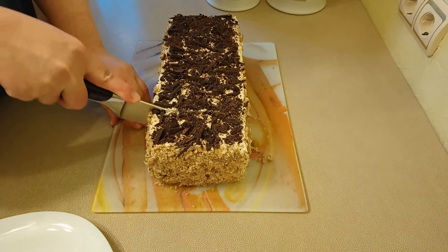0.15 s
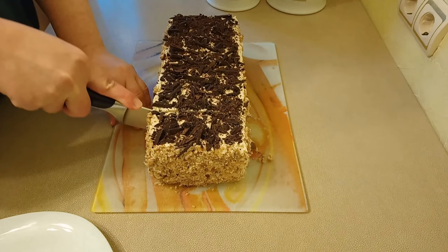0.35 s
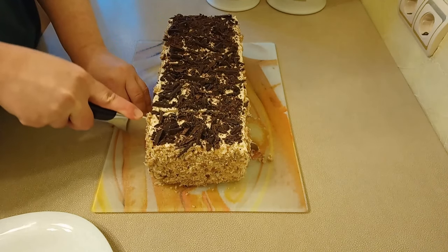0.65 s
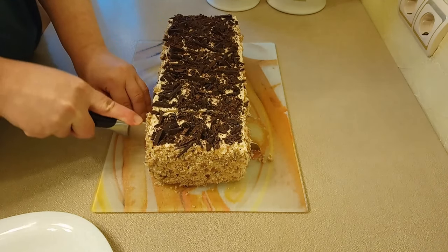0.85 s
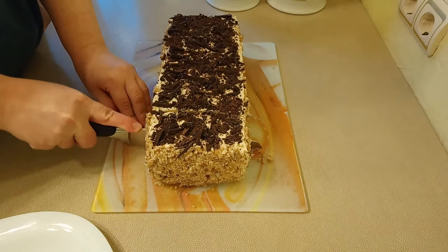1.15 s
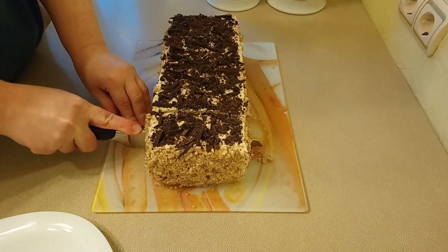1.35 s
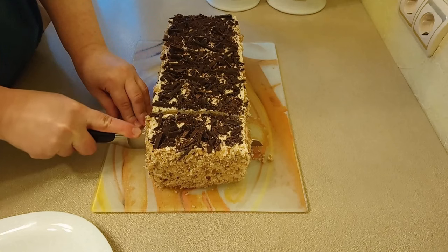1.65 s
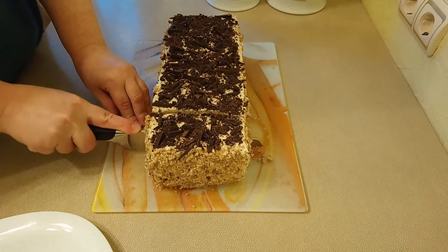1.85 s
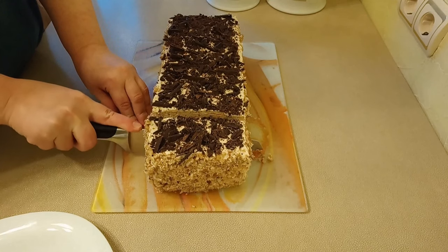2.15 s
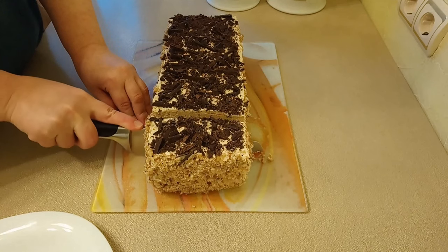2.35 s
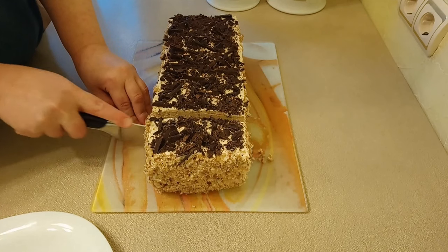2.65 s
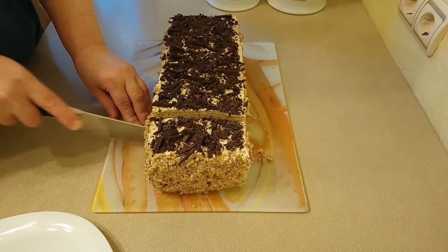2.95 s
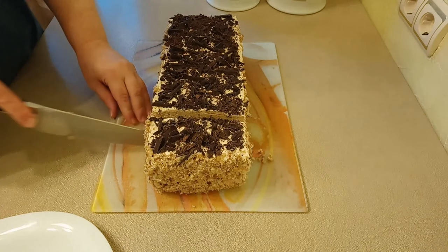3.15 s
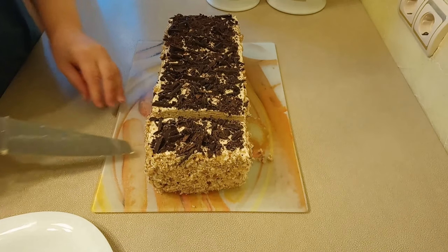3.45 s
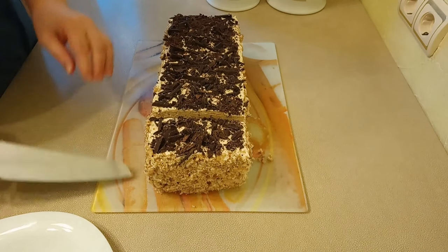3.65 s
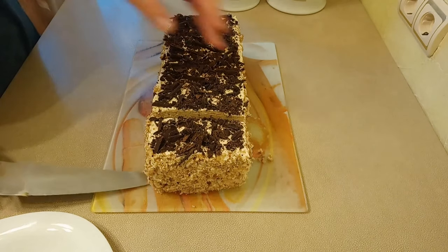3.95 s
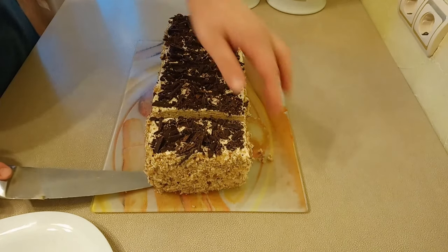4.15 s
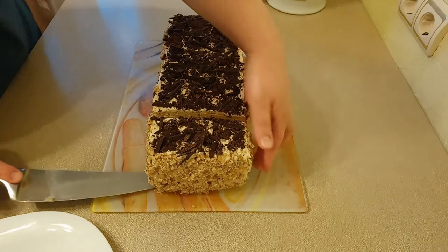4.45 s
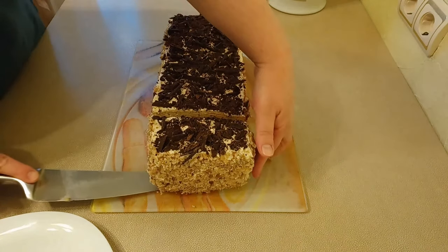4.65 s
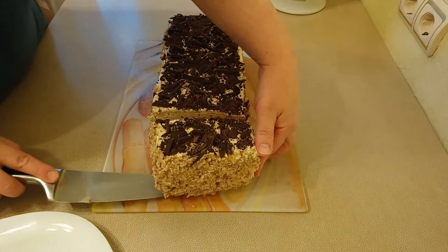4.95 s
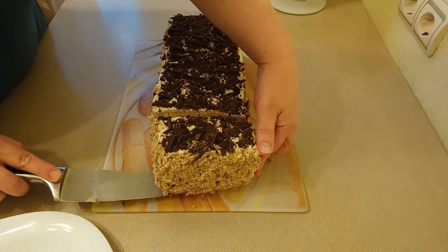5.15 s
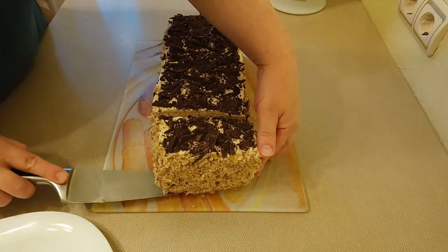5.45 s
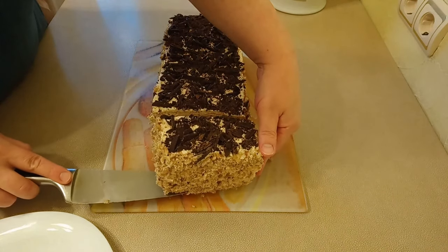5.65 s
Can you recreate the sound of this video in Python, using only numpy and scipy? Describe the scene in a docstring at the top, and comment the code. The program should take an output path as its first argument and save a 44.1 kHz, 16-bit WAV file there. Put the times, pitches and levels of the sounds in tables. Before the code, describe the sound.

A small kitchen is heard closely in stereo, with quiet room air, a low wavering motor hum and very faint high electrical whines towards the right. A tiny tick comes at 0.05 s; at 0.6-0.75 s chocolate and crust snap crisply, with soft sponge rustle until about 1 s. Near 1.8 s the knife edge hits the glass board with a sharp, squeaky knock. Short rasps and knocks follow at 2.0-2.2 s, then stronger gritty drags from 2.55 to 3.1 s, ringing, squeaking and brightening, ending in the hardest catches. The hum swells around 2.3-4.7 s. After a pause, the flat steel blade clinks in a quick cluster at 3.75-3.83 s with a short singing squeal and a low worktop thud. A hand taps at 4.18 s amid faint sliding. Around 4.6-5 s the blade slips under the slice with muffled scraping and rising steel tones; a tiny clink comes at 5.43 s, then quiet.

```python
"""Cutting a slice of layer cake

A small kitchen, heard close by a left and a right microphone, over room air, a low hum and faint whines.
A knife cracks the chocolate with filtered bursts, then knocks and drags on a glass board of ringing modes.
The blade is laid flat with a clink, a hand taps something with one more burst, and the blade is slid
under the slice; its steel modes rise as it is pressed down.
"""
import sys
import numpy as np
from scipy import signal
from scipy.fft import rfft, irfft
from scipy.io import wavfile
from scipy.ndimage import uniform_filter1d, map_coordinates

SR = 44100
rng = np.random.default_rng(int(sys.argv[2]) if len(sys.argv) > 2 else 0)


def unload_audio(sound):
    """Save the sound as a 16-bit wav file, at the path given as the first command line argument."""
    columns = np.transpose(np.atleast_2d(sound))
    # keep every value between -1 and 1, then stretch to whole-number steps
    steps = np.round(np.clip(columns, -1, 1) * 32767)
    wavfile.write(sys.argv[1], SR, steps.astype(np.int16))


N = 255701
TIME = np.arange(N) / SR
# signs of a difference signal at the left and right microphones
OPPOSITE = np.array([[1], [-1]])


def undb(db):
    """Decibels to gain."""
    return 10 ** (np.asarray(db) / 20)


def unit(x):
    """Scale to rms 1."""
    return x / np.sqrt(np.mean(x ** 2) + 1e-30)


def pan(lean_db):
    """Left and right gains that differ by lean_db, left minus right."""
    return undb(np.array([[lean_db], [-lean_db]]) / 2)


def curve(rows, axis=1):
    """One column of a table, joined by straight lines in time."""
    rows = np.array(rows)
    return np.interp(TIME, rows[:, 0], rows[:, axis])


def response(points, hz):
    """Gain of a (freq_hz, level_db) spectrum at the given frequencies."""
    point_hz, point_db = np.transpose(points)
    return undb(np.interp(np.log(hz + 1), np.log(point_hz), point_db))


def convolve(x, ring):
    """Pass a sound through an impulse response, keeping its length."""
    full = signal.fftconvolve(np.atleast_2d(x), np.atleast_2d(ring), axes=-1)
    return full[:, :x.shape[-1]]


def colour(x, points):
    """Causal filter of unit energy with the given spectrum."""
    size = 1024
    # folding the cepstrum forward in time gives the minimum-phase response
    cepstrum = irfft(np.log(response(points, np.fft.rfftfreq(size, 1 / SR))))
    cepstrum[1:size // 2] *= 2
    cepstrum[size // 2 + 1:] = 0
    ring = irfft(np.exp(rfft(cepstrum)))
    return convolve(x, ring / np.linalg.norm(ring))


def add(track, start_s, sound):
    """Mix a sound in at time start_s."""
    i = int(start_s * SR)
    track[..., i:i + sound.shape[-1]] += sound[..., :N - i]


def walk(rate):
    """Smooth random wander of rms 1, with rate knots a second."""
    knots = rng.standard_normal(2048)
    return unit(map_coordinates(knots, [TIME * rate], order=3, mode="wrap"))


def stroke(start_s, length_s, attack_s, release_s, sag_db=0):
    """Gain that rises to 1, holds while sagging by sag_db a second, and dies; ramps are the time for 20 dB."""
    early_s = np.maximum(start_s - TIME, 0)
    late_s = np.maximum(TIME - start_s - length_s, 0)
    ramp_db = -20 * np.minimum(early_s / attack_s + late_s / release_s, 10)
    return undb(ramp_db - sag_db * np.clip(TIME - start_s, 0, length_s))


def grains(rate, spread_db):
    """Random tiny slips of uneven size, about rate a second, rms 1."""
    size = undb(spread_db * np.clip(rng.standard_normal(N), -2, 2))
    happens = rng.random(N) < rate / SR
    return unit(happens * size * rng.choice([-1, 1], N))


def contact(decay_s, chatter):
    """A blow of unit energy: one sharp push and a dying chatter, chatter times as strong in all."""
    t = TIME[:SR // 6]
    push = rng.standard_normal(len(t)) ** 3 * np.exp(-t / decay_s)
    push *= chatter / np.linalg.norm(push)
    push[0] = 1
    return push / np.linalg.norm(push)


def harden(push, treble_db, corner_hz):
    """Change the share of a force that lies above the corner."""
    soft = signal.sosfiltfilt(signal.butter(2, corner_hz, fs=SR, output="sos"), push)
    return soft + undb(treble_db) * (push - soft)


def resonate(push, hz, t60):
    """One mode whose pitch may move; white noise passes at its own level."""
    turn = np.exp(2j * np.pi * np.cumsum(hz) / SR)
    keep = 1000 ** (-1 / (t60 * SR))
    # shift the mode down to 0 Hz, let it leak away, and shift it back up
    slow = signal.lfilter([1], [1, -keep], push / turn)
    return (turn * slow).imag * np.sqrt(2 * (1 - keep ** 2))


def kitchen(x, wet_db, early_db, t60=0.3, early_s=0.0044, shared_hz=800):
    """Direct sound, a quick scatter off the worktop and a tail from the walls; both microphones share the bass."""
    t = TIME[:SR // 2]
    hz = np.fft.rfftfreq(len(t), 1 / SR)
    scatter = undb(early_db) * unit(np.exp(-t / early_s))
    tail = undb(wet_db) * unit(undb(-60 * t / t60) * (t > 2 * early_s))
    mid, side = rfft(rng.standard_normal((2, len(t))) * (scatter + tail)) / np.sqrt(len(t))
    apart = hz ** 2 / (hz ** 2 + shared_hz ** 2)
    paths = 1 + (mid + OPPOSITE * apart * side) / np.sqrt(1 + apart ** 2)
    # the walls smear the sound in time but favour no band
    paths /= np.sqrt(uniform_filter1d(abs(paths) ** 2, size=21))
    return convolve(x, irfft(paths)[:, :SR * 2 // 5])


# room air and hiss, spectrum: freq_hz, level_db
AIR_SPECTRUM = [(25, -17), (85, -4), (170, 2), (215, -2), (270, -13), (500, -13.5), (1200, -16.5),
                (2500, -19.5), (6200, -18), (8200, -30), (13700, -30.5), (15300, -19)]
AIR_DB = -68


def room_air():
    """Steady shaped noise, more alike at the two microphones in the bass."""
    hz = np.fft.rfftfreq(N, 1 / SR)
    mid, side = rfft(rng.standard_normal((2, N)))
    apart = np.clip(hz / 900, .3, 1)
    spread = (mid + OPPOSITE * apart * side) / np.sqrt(1 + apart ** 2)
    return undb(AIR_DB) * unit(irfft(spread * response(AIR_SPECTRUM, hz), N))


# steady hum level, and one louder spell that slowly eases; the ramp is the time for 20 dB
HUM_DB = -73
HUM_SPELL_S, HUM_SPELL_LENGTH_S, HUM_SPELL_DB, HUM_RAMP_S, HUM_SAG_DB_PER_S = 2.295, 2.37, -60.5, 0.24, 4.5


def appliance_hum():
    """Two wavering harmonics, the second and third, of one motor."""
    cycles = np.cumsum(194 + 4 * walk(12)) / SR
    third = undb(3.5 * walk(9)) * np.sin(2 * np.pi * cycles)
    second = undb(-8) * walk(16) * np.sin(2 * np.pi * cycles * 2 / 3)
    spell = stroke(HUM_SPELL_S, HUM_SPELL_LENGTH_S, HUM_RAMP_S, HUM_RAMP_S, HUM_SAG_DB_PER_S)
    return (undb(HUM_DB) + undb(HUM_SPELL_DB) * spell) * (third + second)


# electrical whines: start_s, length_s, pitch_hz, level_db, lean_db (left minus right)
WHINES = [(0, 11, 7380, -92, -21.5), (0.402, 1.23, 6090, -90, -31), (1.95, 2, 6490, -83, -20.5),
          (3.305, 2.7, 5210, -87, -14), (4.349, 1.35, 6505, -85.5, -24.5)]
WHINE_RAMP_S = 0.193


def electrical_whines():
    """Thin sines with a slight pitch tremor, fading in and out, mostly on the right."""
    out = np.zeros((2, N))
    for start_s, length_s, pitch_hz, level_db, lean_db in WHINES:
        tone = np.sin(2 * np.pi * np.cumsum(pitch_hz + 5 * walk(60)) / SR)
        swell = stroke(start_s, length_s, WHINE_RAMP_S, WHINE_RAMP_S)
        out += pan(lean_db) * undb(level_db) * swell * tone
    return out


def background():
    """Air and hum, leaning a little right, and the whines."""
    return pan(-2.3) * (room_air() + appliance_hum()) + electrical_whines()


# hands bumping the worktop: start_s, peak_db, pitch_hz, decay_s
WORKTOP_BUMPS = [(0.906, -56, 125.5, 0.022), (1.779, -56.5, 103, 0.064), (3.825, -49, 156, 0.12),
                 (4.198, -52, 188, 0.06)]


def worktop():
    """Soft pushes of the hands thud in the worktop: dying noise in a narrow low band."""
    out, t = np.zeros(N), TIME[:SR // 2]
    for start_s, peak_db, pitch_hz, decay_s in WORKTOP_BUMPS:
        band = signal.butter(2, [pitch_hz / 1.058, pitch_hz * 1.104], "band", fs=SR, output="sos")
        thud = signal.sosfilt(band, rng.standard_normal(len(t)) * np.exp(-t / decay_s))
        add(out, start_s, undb(peak_db) * thud / abs(thud).max())
    return out


# pressing the blade flat stiffens it, here and in blade(): time_s, rise_hz (of all its modes)
BLADE_PRESS = [(3.75, 9), (3.84, -6), (3.93, 7), (4.13, 111.5), (4.85, 126), (5.43, 51)]
# friction locks on to one blade mode: start_s, length_s, level_db, pitch_hz (without pressure)
BLADE_SQUEALS = [(3.829, 0.07, -41.5, 1222), (3.89, 0.084, -58.5, 751), (4.07, 0.16, -62, 725),
                 (4.08, 0.062, -63, 1682), (4.643, 0.13, -71, 1250), (4.826, 0.13, -59.5, 1244),
                 (5.018, 0.011, -54.5, 1236)]
SQUEAL_ATTACK_S, SQUEAL_RELEASE_S = 0.0075, 0.028


def squeals():
    """The sliding blade sings on single modes, clean at first and breaking up as the load grows."""
    rise_hz, out = curve(BLADE_PRESS), np.zeros(N)
    rough = .3 + rise_hz / 170
    wander, tremble = walk(22), walk(110)
    for start_s, length_s, level_db, pitch_hz in BLADE_SQUEALS:
        # each squeal reads the same tremble from its own places
        size, slip = (np.roll(tremble, lag) for lag in rng.integers(0, N, size=2))
        cycles = np.cumsum(pitch_hz + rise_hz + 7 * wander) / SR
        tone = np.sin(2 * np.pi * cycles + rough * slip)
        swell = stroke(start_s, length_s, SQUEAL_ATTACK_S, SQUEAL_RELEASE_S)
        out += undb(level_db + 4.2 * rough * size) * swell * tone
    return kitchen(out, wet_db=7, early_db=7)


# steel blade modes: pitch_hz (unpressed), t60_s (when tapped), tap_db, slide_db (on the glass),
# buried_db (under the slice)
BLADE_MODES = [(726, 0.16, 6, 6.5, -27), (1080, 0.17, -14, -24, -23.5), (1259, 0.13, 1, 8, 3.5),
               (1695, 0.29, 3.5, 6, -4), (2445, 0.18, -21, 8, 7), (2876, 0.092, -2, 8, 5),
               (3541, 0.084, 7.5, 4, 7), (3910, 0.09, 0.5, -5, 1), (4244, 0.033, -2, 9.5, 5),
               (4750, 0.078, -2.5, 1, -9), (5270, 0.048, -24, -11, -1), (5455, 0.054, 4, -4, -1.5),
               (6340, 0.076, -2, -24.5, -5)]
# blade touching down: start_s, strength_db
BLADE_CLINKS = [(3.754, -11), (3.767, -11.5), (3.807, -9), (3.826, -16.5), (4.835, -22.5), (4.918, -30.5),
                (5.427, -30.5)]
# unpitched tick of the steel, spectrum: freq_hz, level_db
STEEL_TICK_SPECTRUM = [(300, -21), (1000, 6), (6500, 2.5), (9000, -13.5), (13000, -14), (15300, -7.5)]
# flat blade sliding on the glass: start_s, length_s, level_db, attack_s
GLASS_SLIDES = [(3.809, 0.045, -57, 0.064), (4.078, 0.083, -65.5, 0.19)]
SLIDE_RELEASE_S = 0.11
# the blade is pushed under the slice
BURIED_S, BURIED_LENGTH_S, BURIED_DB, BURIED_ATTACK_S, BURIED_RELEASE_S = 4.75, 0.18, -65.5, 0.41, 0.2
# any rubbing contact damps the ring
BURIED_T60_S = 0.036
# the steel sounds no bass below this
BLADE_CUT_HZ = 340


def blade():
    """Taps and sliding friction ring the steel, whose modes rise under pressure and are damped while it rubs."""
    taps = np.zeros(N)
    for start_s, strength_db in BLADE_CLINKS:
        add(taps, start_s, undb(strength_db) * contact(decay_s=0.0077, chatter=32.0))
    sliding = np.zeros(N)
    for start_s, length_s, level_db, attack_s in GLASS_SLIDES:
        sliding += undb(level_db) * stroke(start_s, length_s, attack_s, SLIDE_RELEASE_S)
    rub = grains(rate=5000, spread_db=3.5) * sliding
    crumbs = grains(rate=1400, spread_db=5) * undb(BURIED_DB + 4.6 * walk(35))
    crumbs *= stroke(BURIED_S, BURIED_LENGTH_S, BURIED_ATTACK_S, BURIED_RELEASE_S)

    rise_hz, wander, ring = curve(BLADE_PRESS), walk(22), 0
    for pitch_hz, t60_s, tap_db, slide_db, buried_db in BLADE_MODES:
        # the moving contact feeds and detunes each mode in its own way
        feed, detune = (np.roll(wander, lag) for lag in rng.integers(0, N, size=2))
        pressed_hz = pitch_hz + rise_hz
        rubbed_hz = pressed_hz + 0.011 * pitch_hz * detune
        friction = undb(3.0 * feed) * (undb(slide_db) * rub + undb(buried_db) * crumbs)
        ring = ring + resonate(undb(tap_db) * taps, pressed_hz, t60_s)
        ring = ring + resonate(friction, rubbed_hz, BURIED_T60_S)
    steel = undb(-13.5) * ring + undb(-5.0) * colour(taps + rub + crumbs, STEEL_TICK_SPECTRUM)
    steel = signal.sosfilt(signal.butter(2, BLADE_CUT_HZ, "high", fs=SR, output="sos"), steel)
    return kitchen(steel, wet_db=3.5, early_db=7.5, t60=0.34)


# chocolate and crust snapping, and at 4.182 s a hand touching something with a short tap:
# start_s, peak_db (before the room), centre_hz, width_octaves, decay_s
SNAPS_AND_TAP = [(0.05, -33.5, 7000, 0.6, 0.012), (0.588, -34.5, 4700, 1.28, 0.03),
                 (0.685, -27, 1730, 0.39, 0.0055), (0.685, -32, 4780, 0.26, 0.0035),
                 (0.688, -43.5, 537, 0.17, 0.0073), (0.73, -44, 1810, 0.65, 0.014),
                 (1.775, -26, 5520, 0.32, 0.0048), (4.182, -29, 2110, 1.39, 0.0023)]
# shared by the snaps and the tap, spectrum: freq_hz, level_db
BURST_SPECTRUM = [(100, -0.5), (500, 12), (1000, 8.5), (6500, -4), (8500, -20), (13000, -33), (15300, -3.5)]
# pushes through the sponge: start_s, length_s, level_db
SPONGE_PUSHES = [(0.06, 0.033, -72), (0.646, 0.081, -58), (0.864, 0.024, -63.5), (1.003, 0.029, -67)]
SPONGE_ATTACK_S, SPONGE_RELEASE_S = 0.12, 0.089
# parting crumb, spectrum: freq_hz, level_db
CRUMB_SPECTRUM = [(200, 10.5), (900, 5), (1600, 18.5), (3000, 6.5), (6000, 7.5), (8000, -39), (14000, -57)]


def cake_and_hand_tap():
    """Brittle chocolate snaps, and later a hand taps, in band-shaped bursts; the sponge rustles in soft grains."""
    bursts = np.zeros((1, N))
    hz = np.geomspace(100, 16000, 24)
    for start_s, peak_db, centre_hz, width_octaves, decay_s in SNAPS_AND_TAP:
        body_db = -10 * np.log10(1 + (np.log2(hz / centre_hz) / width_octaves) ** 4)
        body = np.c_[hz, np.maximum(body_db, -24)]
        burst = colour(colour(contact(decay_s, chatter=4.8), body), BURST_SPECTRUM)
        add(bursts, start_s, undb(peak_db) * burst / abs(burst).max())
    parting = np.zeros(N)
    for start_s, length_s, level_db in SPONGE_PUSHES:
        parting += undb(level_db) * stroke(start_s, length_s, SPONGE_ATTACK_S, SPONGE_RELEASE_S)
    rustle = colour(grains(rate=1200, spread_db=6) * parting, CRUMB_SPECTRUM)
    return kitchen(bursts + rustle, wet_db=10, early_db=15.5)


# the edge squeaks on the glass: start_s, length_s, level_db, pitch_hz
EDGE_SQUEAKS = [(0.588, 0.07, -56.5, 980), (1.692, 0.014, -56.5, 999), (1.713, 0.01, -36, 1039),
                (1.778, 0.025, -28.5, 1000), (2.03, 0.03, -39.5, 1060), (2.108, 0.017, -36.5, 1018),
                (2.115, 0.038, -45, 648), (2.191, 0.052, -53.5, 659), (2.529, 0.0098, -42.5, 1008),
                (2.577, 0.07, -36.5, 1126), (2.68, 0.075, -36, 988), (2.841, 0.098, -39, 986),
                (3.019, 0.075, -39, 1005)]
# jitter is a fraction of the pitch
SQUEAK_ATTACK_S, SQUEAK_RELEASE_S, SQUEAK_FLUTTER_DB, SQUEAK_JITTER = 0.0046, 0.01, 0.5, 0.0385


def squeaks():
    """The edge sticks and slips in step with the board's strongest modes: short, rough squeaks."""
    out = np.zeros(N)
    wobble, flutter = walk(330), undb(SQUEAK_FLUTTER_DB * walk(210))
    for start_s, length_s, level_db, pitch_hz in EDGE_SQUEAKS:
        cycles = np.cumsum(pitch_hz * (1 + SQUEAK_JITTER * wobble)) / SR
        swell = stroke(start_s, length_s, SQUEAK_ATTACK_S, SQUEAK_RELEASE_S)
        out += undb(level_db) * swell * np.sin(2 * np.pi * cycles)
    return kitchen(out * flutter, wet_db=-12.5, early_db=-5)


# glass board modes, damped by the cake: pitch_hz, width_hz, level_db (times width), lean_db (left minus right)
BOARD_MODES = [(204, 72, -2, 5), (262, 16, -14.5, -5), (572.7, 13.3, -3.5, 2), (664.4, 79, -4.5, -3),
               (942.6, 28, -3.5, -4.5), (989.3, 40, 5, 1.5), (1102, 63, 0, 3), (1174, 33, -9, 7),
               (1303, 22, -4, -3.5), (1393.6, 46, -2.5, -3.5), (1516, 56, -7.5, -2),
               (1846, 86.6, -4.5, 0.5), (2271, 16, -9, 6), (3150, 90, -7.5, -6.5), (3303, 67, -9.5, 0),
               (4286, 90, -8.5, 2), (4716, 150, -15, -7)]
# dense upper modes of board and edge, spectrum: freq_hz, level_db
EDGE_SPECTRUM = [(60, -16.5), (300, -6.5), (800, -0.5), (1500, 8.5), (2500, 0), (4500, -0.5), (6000, -6.5),
                 (7200, -20.5), (9000, -31), (14000, -63.5)]


def glass(push, edge_db):
    """The board's modes and dense treble answer a force."""
    t = TIME[:SR // 5]
    ring = 0
    for k, (pitch_hz, width_hz, level_db, lean_db) in enumerate(BOARD_MODES):
        # each mode builds up within a cycle; higher ones reach the two microphones out of step
        fade = (1 - np.exp(-pitch_hz * t)) ** 2 * np.exp(-np.pi * width_hz * t)
        skew = OPPOSITE * min(pitch_hz / 2400, np.pi / 4)
        tone = np.sin(2 * np.pi * pitch_hz * t + (-1) ** k * skew + k * np.pi)
        ring = ring + pan(lean_db) * undb(level_db) * width_hz * fade * tone
    return convolve(push, ring / np.linalg.norm(ring[0])) + undb(edge_db) * colour(push, EDGE_SPECTRUM)


# strokes of the edge on the glass: start_s, length_s, level_db, treble_db (at the start),
# bass_db (from bending the board), contact_hz (resonance at the start)
EDGE_DRAGS = [(1.722, 0.005, -38, 2, 0.5, 690), (1.784, 0.02, -39, 1, 10, 724),
              (1.92, 0.17, -59.5, -6, -16, 1030), (2.04, 0.041, -37, -7.5, -16, 1226),
              (2.114, 0.014, -35, -10, -11.5, 720), (2.18, 0.045, -50, -12, -21.5, 630),
              (2.3, 0.012, -50, -3.5, -8, 934), (2.538, 0.084, -49.5, 1, -2, 960),
              (2.612, 0.14, -37, -5, 0.5, 1300), (2.78, 0.2, -37.5, -1, -1, 3020),
              (2.995, 0.034, -43, -2, 1, 3970), (3.068, 0.026, -38, -2, -1, 4480)]
# hard catches of the edge on the glass: start_s, strength_db, treble_db
EDGE_KNOCKS = [(1.776, -10.5, -1), (1.798, -18, -5), (2.037, -14.5, -5.5), (2.108, -14.5, -0.5),
               (2.123, -17.5, 1), (2.582, -17.5, -4.5), (2.613, -11, -4.5), (2.638, -12, -10),
               (2.713, -6.5, -3), (2.743, -11, -8.5), (2.814, -18.5, 4.5), (2.842, -11, 1.5),
               (2.884, -9.5, 6), (2.916, -6, 2.5), (2.962, -12, 2.5), (3.026, -12.5, 4.5),
               (3.043, -4.5, 3.5), (3.066, -2, 3), (3.078, -14.5, -1.5)]
# a longer stroke starts more gently; ramps are the time for 20 dB
DRAG_ATTACK_S, DRAG_ATTACK_PER_LENGTH, DRAG_RELEASE_S = 0.017, 0.18, 0.0097
# as the edge is drawn out towards the tip it bears less, sounds brighter and its contact resonance climbs
DRAG_SAG_DB_PER_S, BRIGHTEN_DB_PER_S, CLIMB_OCTAVES_PER_S = 15.5, 36, 4.58
# crumbs crushed under the edge tick through the rasp: level and treble share against the rasp
GRIT_DB, GRIT_TREBLE_DB = -5, -5.5


def edge_on_glass():
    """The edge rasps in tiny slips, and now and then catches hard; the board rings to both."""
    slips = unit(grains(rate=1000, spread_db=5) * undb(2.6 * walk(170) + 2 * walk(55)))
    grit = undb(GRIT_DB) * harden(grains(rate=100, spread_db=3.0), GRIT_TREBLE_DB, corner_hz=2510)
    push = np.zeros(N)
    for start_s, length_s, level_db, treble_db, _, contact_hz in EDGE_DRAGS:
        drawn_s = np.clip(TIME - start_s, 0, length_s)
        rasp = harden(slips + grit, treble_db + BRIGHTEN_DB_PER_S * drawn_s, corner_hz=1890)
        climbing_hz = contact_hz * 2 ** (CLIMB_OCTAVES_PER_S * drawn_s)
        tone = undb(-12.5) * resonate(slips, climbing_hz, t60=0.0089)
        attack_s = DRAG_ATTACK_S + DRAG_ATTACK_PER_LENGTH * length_s
        swell = stroke(start_s, length_s, attack_s, DRAG_RELEASE_S, DRAG_SAG_DB_PER_S)
        push += undb(level_db) * (rasp + tone) * swell
    for start_s, strength_db, treble_db in EDGE_KNOCKS:
        knock = harden(contact(decay_s=0.001, chatter=1.0), treble_db, corner_hz=1900)
        add(push, start_s, undb(strength_db) * knock)
    # scale the bass alone: gain the whole force, then undo it above the corner
    bass_db = curve(EDGE_DRAGS, axis=4)
    push = undb(bass_db) * harden(push, -bass_db, corner_hz=430)
    return kitchen(glass(push, edge_db=-4.5), wet_db=3.5, early_db=4.5)


# the left microphone is duller: freq_hz, lean_db (left minus right)
MICROPHONE_LEAN = [(100, -3), (1000, -2), (5000, -1), (6500, -11), (7800, -12.5), (10000, -22), (15000, -7)]


def scene():
    """Knife, cake, hands and worktop as they reach the two microphones, over the background."""
    near = rfft(edge_on_glass() + squeaks() + cake_and_hand_tap() + blade() + squeals() + worktop())
    lean = np.sqrt(response(MICROPHONE_LEAN, np.fft.rfftfreq(N, 1 / SR)))
    return irfft(near * np.array([lean, 1 / lean]), N) + background()


TOP_HZ = 15600


def record(dry):
    """The recorder cuts the top with a steep low-pass."""
    return signal.sosfilt(signal.ellip(10, .2, 70, TOP_HZ, fs=SR, output="sos"), dry)


dry = scene()
out = record(dry)
unload_audio(out)
```